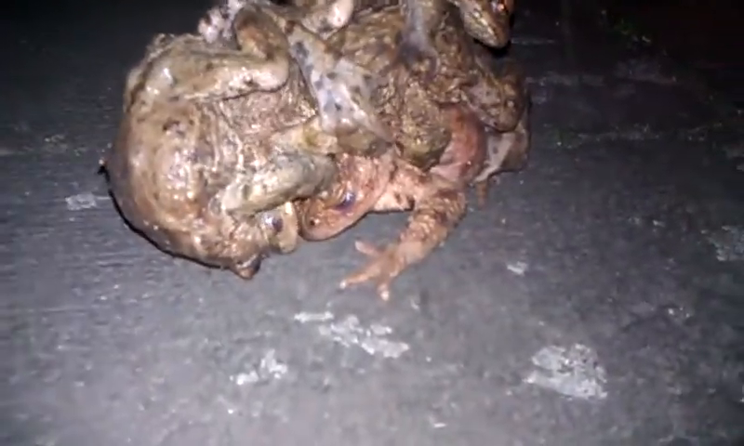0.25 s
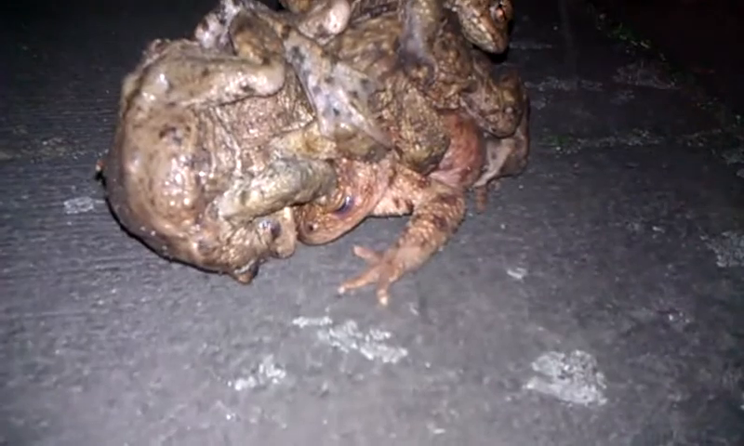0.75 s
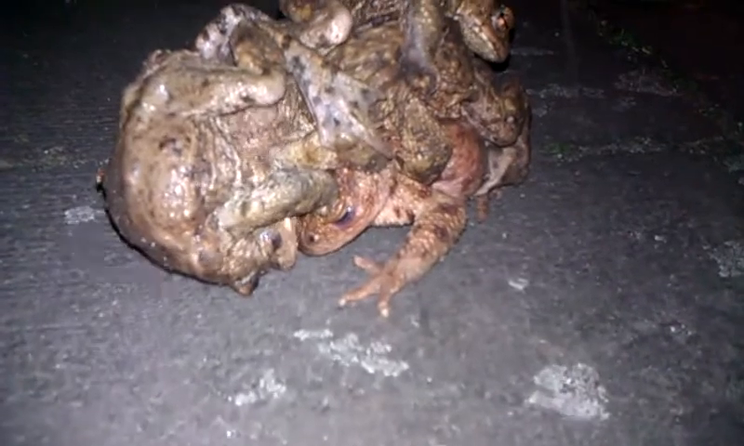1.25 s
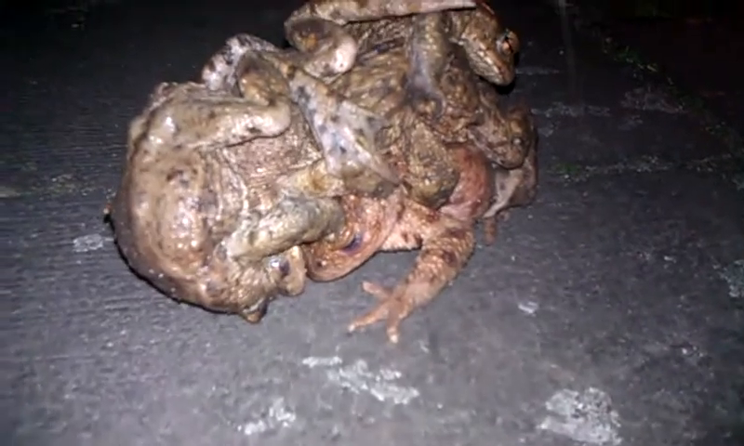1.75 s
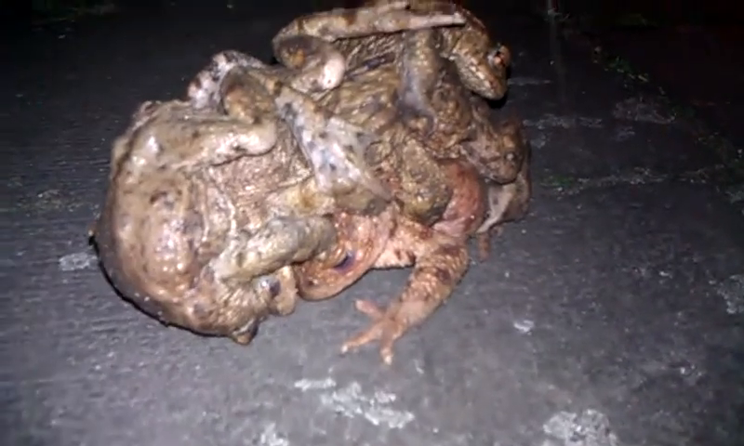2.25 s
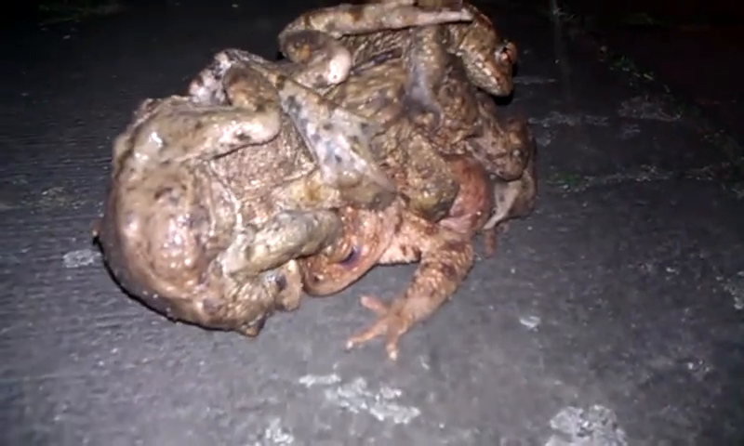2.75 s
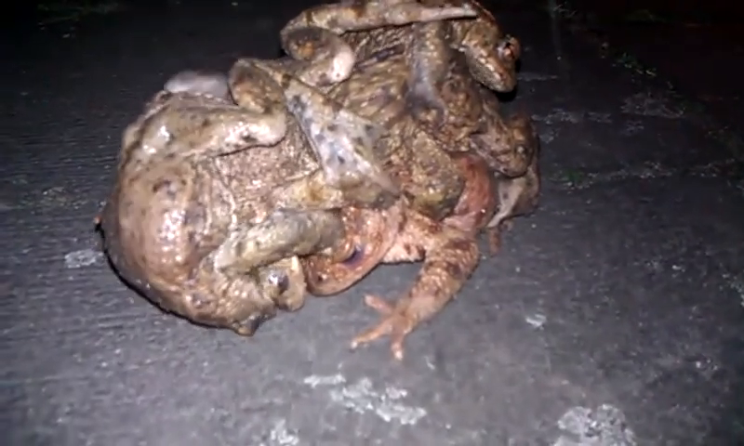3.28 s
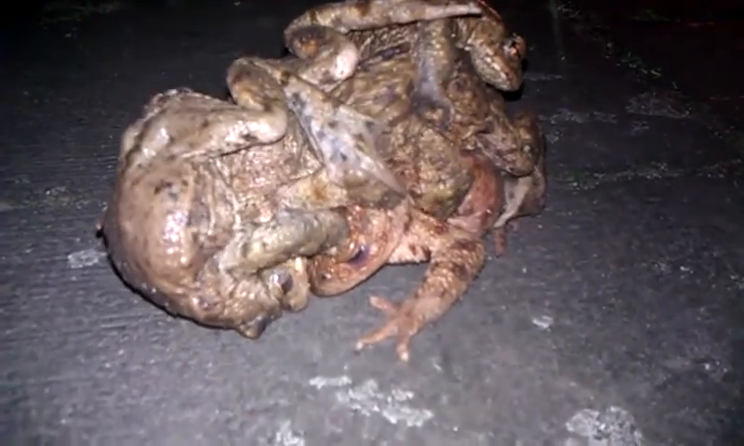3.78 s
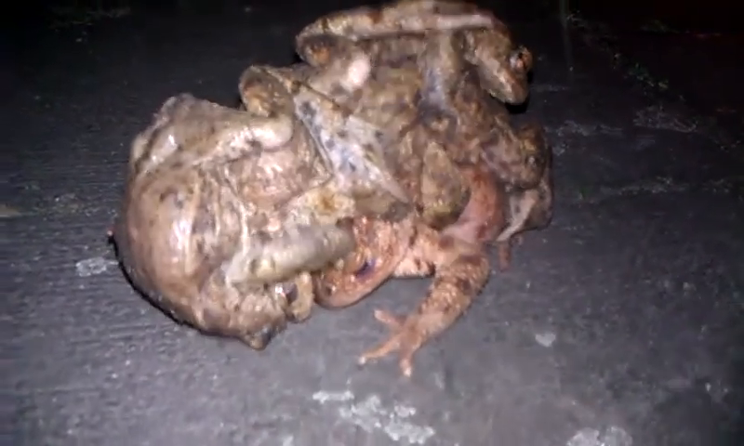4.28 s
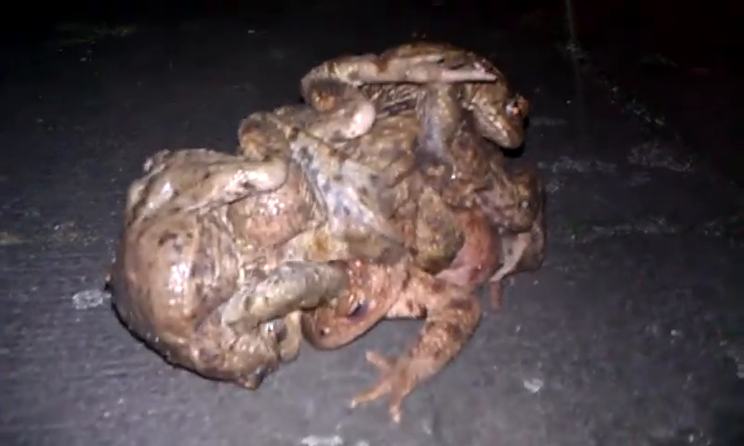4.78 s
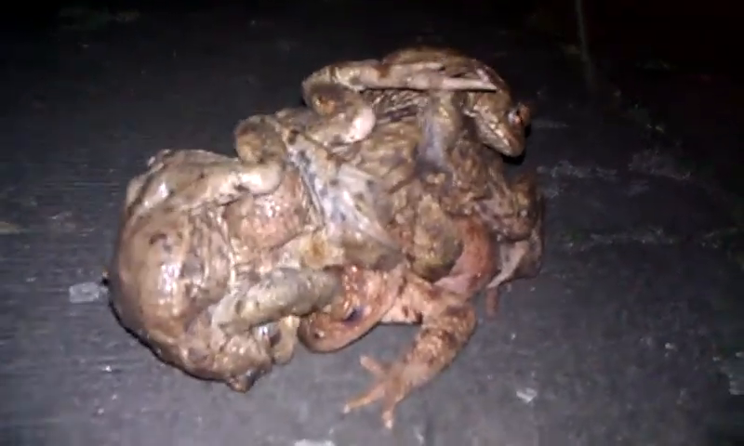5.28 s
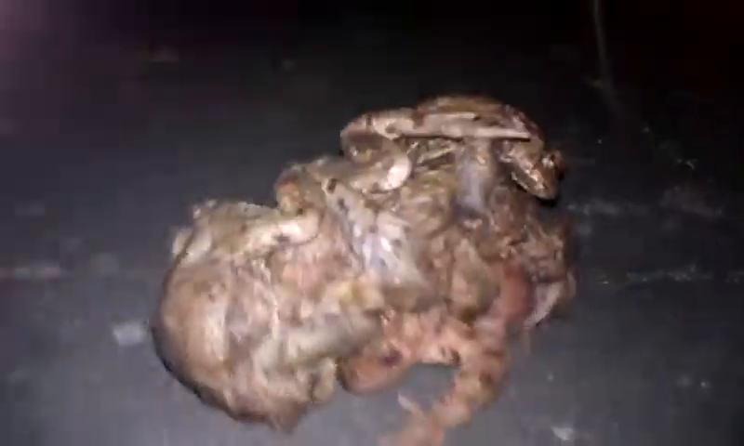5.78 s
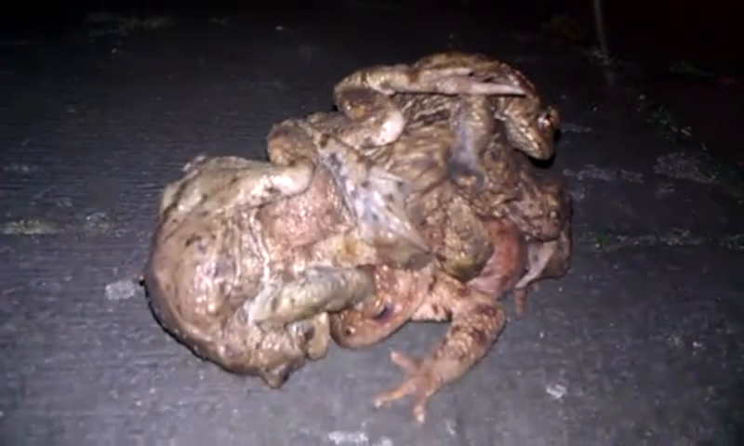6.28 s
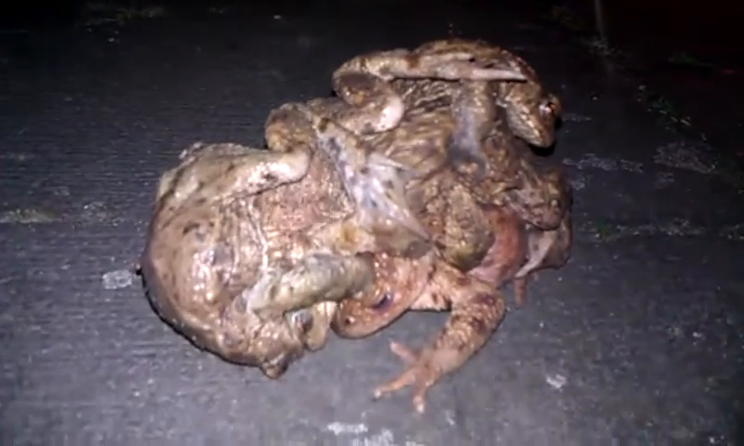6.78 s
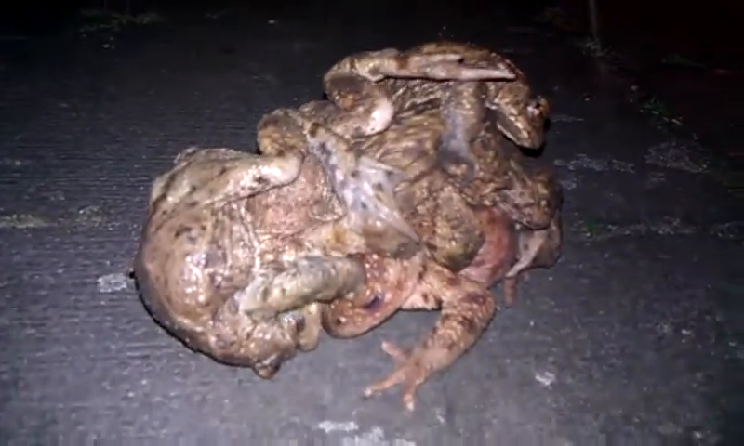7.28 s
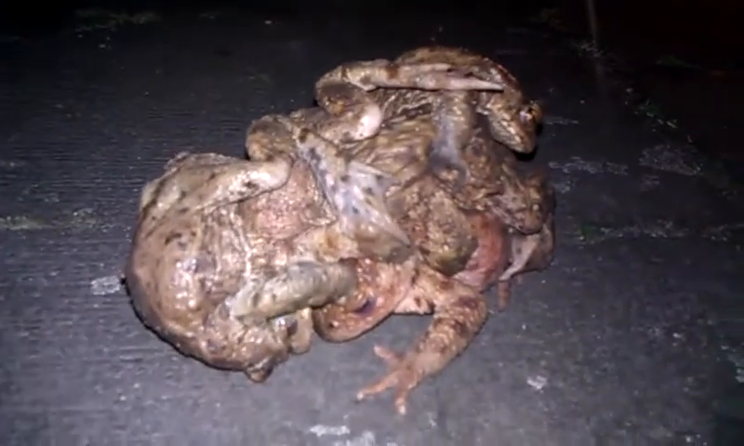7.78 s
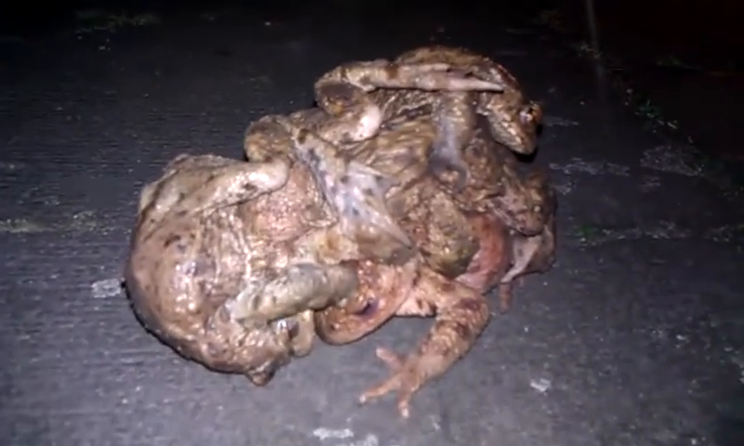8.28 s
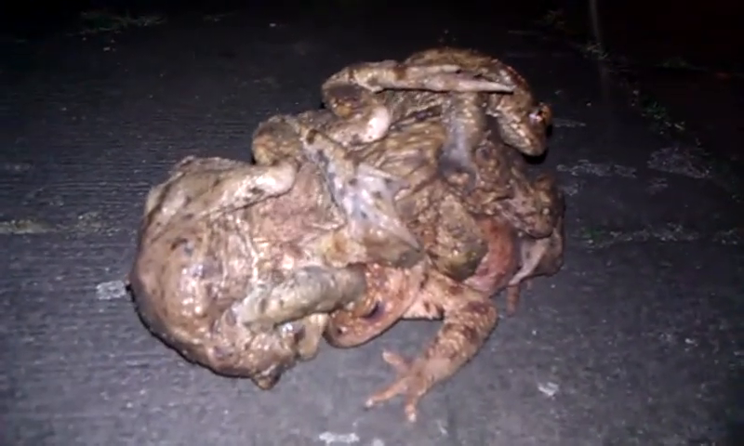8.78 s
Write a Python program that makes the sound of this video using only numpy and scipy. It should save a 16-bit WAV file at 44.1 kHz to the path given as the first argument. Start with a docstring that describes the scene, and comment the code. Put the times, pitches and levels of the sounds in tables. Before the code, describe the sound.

Toads clasped together at night give short rattling chirps, often in pairs, with one reedy peep and a sudden burst of fabric rustle and snaps.

```python
"""Short rattling calls, each running into a falling whistle, sound close by; a single reedy peep joins in.
They are release calls of toads clasped in a mating ball on a road at night: the rattle is a train of valve
openings, the whistle the valve held open, and both are a driven fundamental with overtones and air noise.
Something like a jacket sleeve swishes (shaped noise) and snaps (noise cracks over decaying thuds).
Behind lie quiet night air, a thin hiss and a far, low drone (a wavering sine)."""
import sys
import numpy as np
from scipy import signal
from scipy.fft import rfft, irfft, next_fast_len
from scipy.io import wavfile

SR = 44100
rng = np.random.default_rng(int(sys.argv[2]) if len(sys.argv) > 2 else 0)


def log_audio(samples):
    """Write samples as a 16-bit WAV file to the path given in sys.argv[1]."""
    # one column per channel
    frames = np.atleast_2d(samples).T
    # limit to full scale, then quantise
    limited = np.clip(frames, -1, 1)
    pcm = np.round(limited * 32767).astype(np.int16)
    wavfile.write(sys.argv[1], SR, pcm)


N = 399105
TIME = np.arange(N) / SR
BINS_HZ = np.fft.rfftfreq(next_fast_len(N, True), 1 / SR)


def caller(size=5000):
    """Pulsed phonation: all the release calls of the nearest toad."""
    # release calls: start_s, pulse_count, rattle_s, slowing (1 = even pulses), whistle_s, final_pitch_hz,
    # level_db, overtones_db, treble_db (added in full from 14 kHz up)
    calls = [ (0.9422, 4, 0.023, 0.91, 0.026, 1059, -21, 1.5, 5),
             (1.2934, 8, 0.042, 1.23, 0.033, 1054, -21.5, 2.5, 2.5),
             (2.2564, 4, 0.021, 1.19, 0.034, 1061, -20.5, 2, 9),
             (2.7582, 6, 0.032, 1.13, 0.03, 1077, -19, 1.6, 6),
             (5.5220, 2, 0.0093, 1.00, 0.048, 1069, -23, 0.5, -6),
             (5.8740, 6, 0.035, 0.89, 0.039, 1054, -22, 1, 0),
             (6.5890, 4, 0.02204, 1.06, 0.031, 1075, -20.5, 0.8, 4),
             (6.9572, 9, 0.043, 1.03, 0.038, 1051, -22.5, 0.9, 2.5),
             (8.6574, 2, .0088, 1.00, 0.036, 1066, -20.5, 0, 0),
             (9.0456, 4, 0.032, 1.00, .0300, 1045, -20.5, 1, -2)]
    # air rushing through the valve: frequency_hz, density_db (per Hz)
    rasp_spectrum = [(200, -17), (600, -9), (1000, -8), (1600, 8.5), (2000, -1), (2400, 1), (2900, -9.5),
                     (3500, -0.5), (4500, -5.5), (6500, -6.5), (8000, -16), (11000, -8), (12200, -20),
                     (14700, -7), (16200, -7.5)]
    out, flutter, rasp = np.zeros(N), band(0, 1150), noise(rasp_spectrum)
    for i, (start, count, rattle, slowing, whistle, hz, db, overtone_db, treble_db) in enumerate(calls):
        own = slice(i * size, (i + 1) * size)
        call = croak(int(round(count)), rattle, slowing, whistle, hz, overtone_db, treble_db,
                     flutter[own], rasp[own])
        add(out, start, undb(db) * call)
    return out


def croak(count, rattle, slowing, whistle, final_hz, overtone_db, treble_db, flutter, rasp,
          first_width=0.00049, last_width=0.0019, first_db=-2.0, pulse_db=1.5,
          sag=0.79, pause=0.0023, swell=0.0052,
          first_sharp=.24, last_sharp=0.0695, kick=0.081, settle=0.0081,
          rough=0.028, smooth=0.0055, loosen=0.01494,
          rasp_db=-18.5, leak=0.32, ring_share=0.12, ring=0.0034, fade=2.5):
    """Relaxation oscillation: the valve pops open ever longer and lower, then stays open for the whistle.

    Durations are in seconds; sharpness, kick and roughness are fractions of the final pitch."""
    # overtones of the caller against its fundamental: frequency_hz, gain_db (before the call's own tilt)
    throat_points = [(2150, -24), (2850, -25), (3250, -25), (3900, -27.5), (4350, -24), (5400, -34.5),
                     (7600, -39.5), (9600, -34), (10800, -24), (12200, -36), (14000, -21.5), (15100, -18),
                     (16200, -35)]
    t = np.arange(len(flutter)) / SR
    order = np.arange(count) / (count - 1)
    jitter = rng.normal(0, 0.00039, count) * (order > 0)
    starts = rattle * order ** slowing + jitter

    # the valve loosens as the whistle comes near
    loose = np.exp((starts - rattle) / loosen)
    widths = (first_width + (last_width - first_width) * loose)[:, None]
    age = t - starts[:, None]
    from_peak = age - .0003 - widths

    # every opening is a short burst with a steep front that rings on a little; the first ones are softer
    front = np.clip(age / 0.00092 + 0.29, 0, 1)
    bursts = np.exp(-.5 * (from_peak / widths) ** 2) * front
    rings = ring_share * gate(np.maximum(from_peak, 0), 0.0022, 0.002, ring)
    softening_db = first_db * (1 - order) ** 2 * (1 - loose) ** 2
    sizes = undb(pulse_db + softening_db + rng.normal(0, 1.0, count))[:, None]
    pulses = np.max(sizes * (bursts + rings), axis=0)

    # lung pressure sags through the whistle, taking level and brightness with it
    since = np.maximum(t - rattle - pause, 0)
    pressure = np.exp(-sag * (since / whistle) ** 1.66)
    tone = gate(since, swell, whistle + 0.0023, 0.0019) * pressure
    swing = np.hypot(pulses, tone)
    drive = swing * np.exp(-fade * (since / whistle) ** 3)

    # a tight valve sounds sharp; the pitch settles during the whistle
    tight = 1 - np.exp(np.minimum(t - rattle, 0) / loosen)
    sharp = (last_sharp + (first_sharp - last_sharp) * tight) * np.exp(-since / settle)
    # each opening starts sharp and rough, and air leaks past the valve between openings
    opening = np.sum(np.exp(-(age / 0.001376 - .5) ** 2), axis=0)
    unsteady = np.exp(-since / 0.0062)
    kicks = kick * (opening - 0.248 * unsteady)
    wobble = (smooth + rough * unsteady) * flutter
    hz = final_hz * (1 + sharp + kicks + wobble)
    phase = 2 * np.pi * np.cumsum(hz) / SR

    throat = [(f, db + overtone_db + treble_db * min(f / 14000, 1) ** 2) for f, db in throat_points]
    buzz = overtones(phase, hz, drive, throat, order=15, steepen=0.43)
    air = swing * (opening + 0.18 * drive) + leak * unsteady
    return swing * (np.sin(phase) + buzz) + undb(rasp_db + treble_db / 2) * rasp * air


def peeper(size=2400):
    """Sustained phonation: a second toad's one note starts sharp, settles, and lifts as its valve closes."""
    # overtones of the second toad against its fundamental: frequency_hz, gain_db
    peep_throat = [(1150, 0), (2300, -8), (3450, -13), (4600, -27), (6900, -26.5), (8000, -43), (9200, -37),
                   (16000, -48)]
    start_s, hold_s, attack_s, ring_s = 3.7006, .029, 0.0026, 0.0026
    level_db, fade_db_per_s = -27.5, -190
    base_hz, sharp_hz, settle_s, lift_hz = 1135, 110, 0.0022, 76
    out, t = np.zeros(N), np.arange(size) / SR
    closing = np.minimum(t / hold_s, 1.2) ** 3
    hz = base_hz + sharp_hz * np.exp(-t / settle_s) + lift_hz * closing
    phase = 2 * np.pi * np.cumsum(hz) / SR
    drive = gate(t, attack_s, hold_s, ring_s) * undb(fade_db_per_s * t)
    note = np.sin(phase) + overtones(phase, hz, drive, peep_throat, order=13, steepen=.1)
    add(out, start_s, undb(level_db) * drive * note)
    return out


def overtones(phase, hz, drive, throat, order, steepen):
    """Source and filter: harmonics above the fundamental; the high ones die first as the drive falls."""
    k = np.arange(2, order + 1)[:, None]
    gain = undb(colour_db(throat, k * hz)) * drive ** (steepen * np.log(k / 2))
    start_phase = rng.uniform(0, 2 * np.pi, k.shape)
    return np.sum(gain * np.sin(k * phase + start_phase), axis=0)


def gate(t, rise, hold, ring):
    """Driven, damped oscillator: the level swings up, is held for a while, then rings out."""
    up = np.sin(np.pi / 2 * np.clip(t / rise, 0, 1)) ** 2
    return up * np.exp(-np.logaddexp(0, 2 * (t - hold) / ring) / 2)


def sleeve(grip_db=-32, grip_range_db=4):
    """Sliding friction: threads slip over each other, and hard strokes scrape with another colour than light."""
    # sleeve strokes: fastest_s, level_db, swell_s, decay_s, treble_db (split near 9 kHz)
    sleeve_strokes = [ (4.844, -21, 0.0078, 0.013, 5), (4.885, -37.5, 0.031, 0.043, 3),
                      (4.96, -41.5, 0.0094, 0.041, -6), (5.085, -40.5, 0.077, .085, 2),
                      (5.19, -48.5, 0.025, .016, -10), (5.41, -46, .004, 0.018, -10),
                      (5.498, -43.5, 0.015, 0.07, -15), (5.577, -39, 0.0087, .018, -10)]
    # faint brushes: middle_s, width_s, level_db
    faint_brushes = [(3.27, .05, -66), (5.64, 0.029, -67), (6.92, 0.048, -69), (7.74, .05, -68),
                     (8.35, 0.024, -59)]
    # cloth pressed hard: frequency_hz, density_db (per Hz)
    scrape_spectrum = [(600, -54), (2000, -43), (2800, -35), (3200, -5.5), (4200, -27), (5400, 3),
                       (8200, 0), (9600, -15), (12500, -9), (15500, -5), (16200, -28)]
    # cloth sliding lightly: frequency_hz, density_db (per Hz)
    slide_spectrum = [(1500, -33), (3000, -17), (4500, -10), (5200, -3.5), (5700, -1), (6500, -6),
                      (8300, -10), (10000, -13.5), (13000, -18), (15500, -17), (16200, -39)]
    power, treble_power = np.zeros(N), np.zeros(N)
    for s, db, swell, decay, treble_db in sleeve_strokes:
        level = undb(db) * stroke(s, swell, decay)
        power += level ** 2
        treble_power += (level * undb(treble_db)) ** 2

    # the stronger the stroke, the more scraping replaces sliding
    effort_db = 10 * np.log10(power + 1e-18)
    grip = 1 / (1 + np.exp((grip_db - effort_db) / grip_range_db))
    slips = np.sqrt(grip) * noise(scrape_spectrum) + np.sqrt(1 - grip) * noise(slide_spectrum)
    body = signal.sosfiltfilt(signal.butter(2, 9000, fs=SR, output="sos"), slips)
    treble = slips - body
    strokes = np.sqrt(power) * body + np.sqrt(treble_power) * treble

    brushes = np.zeros(N)
    for s, width, peak_db in faint_brushes:
        brushes += undb(peak_db) * np.exp(-.5 * ((TIME - s) / width) ** 2)
    return strokes + brushes * band(5950, 330)


def stroke(s, swell, decay, stop_s=0.14):
    """Frictional damping: cloth gathers speed up to time s, then slides until friction stops it."""
    before, after = np.minimum(TIME - s, 0), np.maximum(TIME - s, 0)
    return np.exp(-.5 * (before / swell) ** 2 - after / decay - (after / stop_s) ** 4)


def snaps(thud_decay=0.0036, thud_rise=0.00065, thud_gain_db=2):
    """Sudden release of tension: a taut fold lets go with a bright crack, some crackle and a dull thud."""
    # snaps of the fabric: start_s, level_db, decay_s, thud_db (before thud_gain_db), crackle_db
    fabric_snaps = [(4.8138, -36, 0.0014, -22, -14), (4.8312, -21.5, 0.0016, -32, -15),
                    (5.4070, -42, 0.0023, -33, -3.5), (5.4945, -36, 0.003, -30, -2.5),
                    (5.5010, -35, 0.0055, -30, -5), (5.5688, -18.5, 0.00081, -28, -13),
                    (5.5866, -33, 0.0013, -24, -10), (5.5906, -14.5, 0.0016, -17, -22)]
    # the bright crack: frequency_hz, density_db (per Hz)
    crack_spectrum = [(300, -40), (800, -17), (2000, -20), (3600, -54), (4600, -1), (5300, 2.5), (6700, -4),
                      (8200, -13), (9400, -11), (12000, -25), (15800, -33)]
    # the dull ring under a snap: frequency_hz, gain_db
    thud_modes = [(400, -10), (510, -2.5)]
    out, crack, crackle = np.zeros(N), noise(crack_spectrum), band(3900, 850)
    t = TIME[:SR // 20]
    ringing = sum(undb(db) * np.sin(2 * np.pi * hz * t) for hz, db in thud_modes)
    thud = ringing * gate(t, thud_rise, .001, thud_decay)
    for i, (s, db, decay, thud_db, crackle_db) in enumerate(fabric_snaps):
        own = slice(i * len(t), (i + 1) * len(t))
        bright = crack[own] + undb(crackle_db) * crackle[own]
        bright = bright * gate(t, 0.00022, 0.00061, decay)
        add(out, s, undb(db) * (bright + undb(thud_db + thud_gain_db) * thud))
    return out


def surroundings(x, wet_db=-44, t60=1.0, dull_hz=3000, echo_s=0.091, echo_db=-35):
    """Scattering and reflection: open ground returns a faint, dull tail and one echo from across the road."""
    t = TIME[:SR // 2]
    dull = signal.butter(1, dull_hz, fs=SR, output="sos")
    scatter = signal.sosfilt(dull, rng.standard_normal(len(t)))
    tail = scatter * undb(-60 * t / t60)
    echo_dull = signal.butter(2, 1800, fs=SR, output="sos")
    echo = signal.sosfilt(echo_dull, scatter * np.exp(-((t - echo_s) / .008) ** 2))
    response = undb(wet_db) * tail / np.linalg.norm(tail)
    response = response + undb(echo_db) * echo / np.abs(rfft(echo)).max()  # echo set by its spectral peak
    return x + signal.fftconvolve(x, response)[:N]


def night(waver_db=0.16, swell_edge=2.2):
    """Superposed steady sources: slowly growing air noise, a thin hiss, and a far drone that swells and fades."""
    # swells of the far drone: middle_s, half_length_s, level_db
    drone_swells = [(.13, 0.16, -48), (0.726, .07, -58.5), (1.1, 0.11, -63.5), (2.3, 0.17, -62),
                    (2.978, 0.13, -50.5), (3.328, 0.1, -57), (6.2, .22, -60)]
    # still air: frequency_hz, density_db (per Hz)
    air_spectrum = [(15, -33), (25, -2), (53, -6.5), (76, -6), (130, -3), (161, -7.5), (200, -9.5),
                    (241, -10.5), (449, -12), (749, -11), (2970, -23.5), (4570, -24), (5980, -25),
                    (8050, -26.5), (15800, -30)]
    drone_hz, drone_rest_db = 58.5, -67.5
    hiss_low_db, hiss_high_db, hiss_rises_s, hiss_rise_time_s = -74.5, -69.5, 4.9, 0.27
    air_start_db, air_rise_db_per_s = -57.5, 0.1348

    drone_power = undb(drone_rest_db) ** 2
    for s, half, db in drone_swells:
        drone_power = drone_power + undb(db) ** 2 * np.exp(-np.abs((TIME - s) / half) ** swell_edge)
    drone_level = np.sqrt(drone_power) * undb(band(0, 2.8))
    wandering_hz = drone_hz + 1.07 * band(0, 2.3)
    drone = np.sqrt(2) * np.sin(2 * np.pi * np.cumsum(wandering_hz) / SR)

    risen = (1 + np.tanh((TIME - hiss_rises_s) / hiss_rise_time_s)) / 2
    hiss = undb(hiss_low_db + (hiss_high_db - hiss_low_db) * risen) * band(6080, 1120)
    air_db = air_start_db + air_rise_db_per_s * TIME + waver_db * band(0, 10.0)
    return noise(air_spectrum) * undb(air_db) + hiss + drone_level * drone


def undb(db):
    """Level definition: decibels to an amplitude ratio."""
    return 10 ** (np.asarray(db) / 20)


def colour_db(points, hz):
    """Spectral envelope: levels interpolated on a log-frequency axis."""
    f, db = np.transpose(points)
    return np.interp(np.log(np.maximum(hz, 1)), np.log(f), db)


def coloured(gain):
    """Spectral shaping: white noise weighted bin by bin, rms 1."""
    white = rng.standard_normal(len(gain)) + 1j * rng.standard_normal(len(gain))
    x = irfft(gain * white)[:N]
    return x / x.std()


def noise(points):
    """Broadband noise of a given spectral density, rms 1."""
    return coloured(undb(colour_db(points, BINS_HZ)))


def band(hz, width_hz):
    """Narrowband noise under one bell-shaped spectrum, rms 1; at 0 Hz it is a slow random drift."""
    return coloured(np.exp(-.5 * np.minimum(((BINS_HZ - hz) / width_hz) ** 2, 10 ** 2)))


def add(out, s, x):
    """Linear superposition: mix x in from time s on."""
    i = int(s * SR)
    out[i:i + len(x)] += x[:max(N - i, 0)]


def scene():
    """Superposition of all sources, reaching both channels alike."""
    mono = surroundings(caller() + peeper() + sleeve() + snaps()) + night()
    return np.array([mono, mono])


def record(dry, low_hz=29, top_hz=15900):
    """Band limiting: a high-pass thins the deepest bass and a steep low-pass cuts the top."""
    thinned = signal.sosfilt(signal.butter(2, low_hz, "high", fs=SR, output="sos"), dry)
    return signal.sosfilt(signal.ellip(8, .2, 70, top_hz, fs=SR, output="sos"), thinned)


dry = scene()
out = record(dry)
log_audio(out)
```